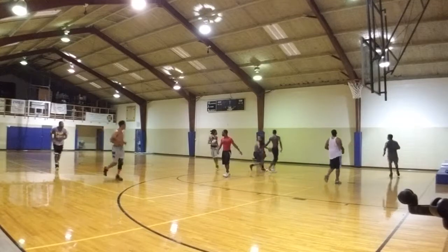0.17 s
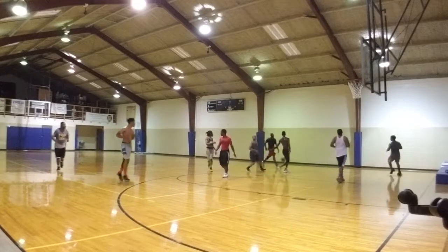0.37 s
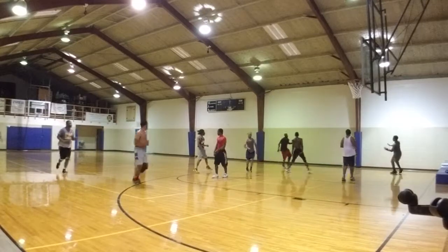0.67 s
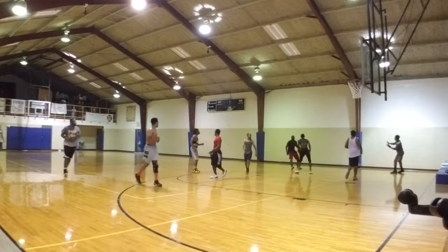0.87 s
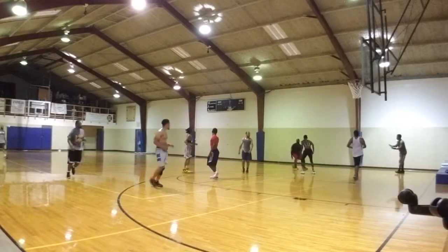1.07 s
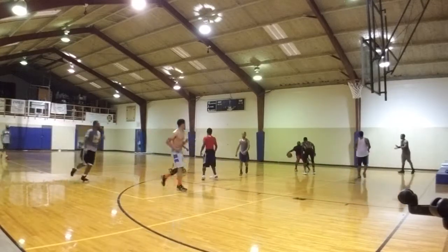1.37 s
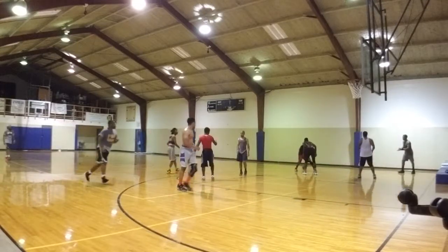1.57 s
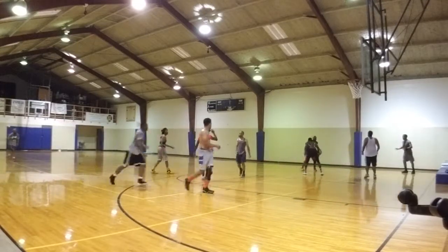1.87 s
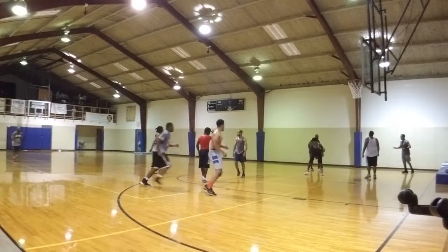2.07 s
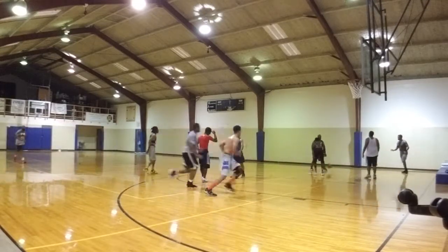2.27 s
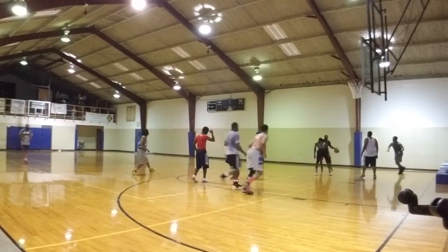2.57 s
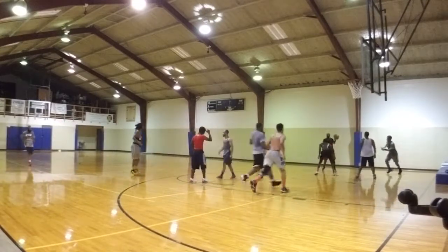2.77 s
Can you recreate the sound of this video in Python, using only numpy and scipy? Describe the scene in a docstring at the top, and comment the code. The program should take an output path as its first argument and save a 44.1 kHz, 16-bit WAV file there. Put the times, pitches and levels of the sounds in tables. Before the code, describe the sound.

A basketball is dribbled four times at an uneven pace on a wooden gym floor, each bounce slapping and booming. Sneakers squeak briefly throughout, with a few footfalls and scuffs, in a large echoing hall with a low ventilation rumble.

```python
"""Pick-up basketball in a large gym.

Rubber soles stick and slip in short squeaks; feet thud and scuff on a sprung wooden floor.
The ball is dribbled four times: a slap, the ping of the air inside, a boom swelling from the boards.
The hall rings on over a low ventilation rumble."""
import sys
import numpy as np
from scipy import signal
from scipy.fft import rfft, irfft
from scipy.io import wavfile

SR = 44100
rng = np.random.default_rng(int(sys.argv[2]) if len(sys.argv) > 2 else 0)


def wrap_up_sound(samples):
    """Save the sound to the file named by the first command line argument, as 16-bit audio."""
    columns = np.atleast_2d(samples).T
    # keep every value between -1 and 1, then stretch to whole-number steps
    tamed = np.clip(columns, -1, 1)
    steps = np.round(tamed * 32767).astype(np.int16)
    wavfile.write(sys.argv[1], SR, steps)


N = 127890
LEAD = SR // 4   # run-in samples: the game is already under way
CUTOFF_HZ = 15700


def from_db(db):
    """Decibels to gain."""
    return 10 ** (np.asarray(db) / 20)


def at_hz(points, hz):
    """Interpolate a table over log frequency."""
    f, value = np.transpose(points)
    return np.interp(np.log(np.maximum(hz, 1)), np.log(f), value)


def noise(spectrum, size):
    """Coloured stereo noise, rms 1, channels alike in the bass."""
    # left-right likeness: freq_hz, correlation
    likeness = [(120, 0.99), (250, 0.91), (550, 0.017)]
    hz = np.fft.rfftfreq(size, 1 / SR)
    alike = np.clip(at_hz(likeness, hz), -.99, .995)
    mid, side = rfft(rng.standard_normal((2, size)))
    stereo = np.sqrt(1 + alike) * mid + np.sqrt(1 - alike) * side * [[1], [-1]]
    x = irfft(from_db(at_hz(spectrum, hz)) * stereo, size)
    return x / x.std()


def wobble(hz, size):
    """Low-passed noise, std 1."""
    x = signal.sosfilt(signal.butter(2, hz, fs=SR, output="sos"), rng.standard_normal(size))
    return x / x.std()


def panned(db):
    """Stereo gains; db is left minus right."""
    return from_db([[db / 2], [-db / 2]])


def add(track, start_s, x):
    """Mix x in at start_s after the run-in."""
    i = LEAD + int(start_s * SR)
    size = min(x.shape[-1], track.shape[-1] - i)
    track[..., i:i + size] += x[..., :size]


def bump(t, peak_s):
    """Envelope: rises to 1 at peak_s, then decays."""
    return t / peak_s * np.exp(1 - t / peak_s)


def floor_mode(t, hz, peak_s, steepness):
    """One resonance of the boards, building up and dying away."""
    return np.sin(2 * np.pi * hz * t) * bump(t, peak_s) ** steepness


def rumble():
    """Steady low noise of ventilation and distant play."""
    # rumble spectrum: freq_hz, density_db
    spectrum = [(35, -16.5), (65, -7.5), (90, -5.5), (125, 0), (170, -4), (280, -12), (400, -20),
                (600, -18.5), (900, -29), (3000, -34.5), (4200, -37.5), (6000, -29.5), (9000, -49),
                (15000, -46)]
    return from_db(-30.5) * noise(spectrum, LEAD + N) * panned(-2.06)


def squeaks():
    """Soles stick and slip thousands of times a second; the rate glides, settles and jitters."""
    # sole slips: start_s, length_s, start_hz, end_hz, level_db, overtone_db, roughness, pan_db, hall_db
    slips = [ (-.08, 0.064, 2440, 2358, -35, -20, 0.57, -6, 2.5),
             (0.063, 0.017, 4940, 4580, -31, -19, 0.42, -9.5, -2.5),
             (0.136, 0.023, 4400, 4080, -40, -19, 0.54, -5, 5),
             (0.299, 0.036, 4950, 4290, -25.5, -6.5, 0.94, -8.5, -1),
             (0.317, 0.018, 3430, 3050, -36, -18, 0.58, 8, 4.5),
             (0.333, 0.048, 4283, 4197, -22.5, -17, 0.73, -2, -4),
             (0.36, 0.0095, 4080, 3710, -31, -4.5, 0.4, -28, 5),
             (0.448, 0.073, 4300, 4160, -31.5, -16, 0.45, -10.5, -4),
             (0.545, 0.046, 5035, 4390, -30, -15.5, 0.93, -7.5, -1),
             (0.562, 0.024, 3464, 3353, -33, -16, 0.28, 3, 0.5),
             (0.669, 0.012, 2530, 2720, -24, -12.5, 0.64, -6.5, -3),
             (0.826, 0.021, 3930, 3604, -28, -10, 0.56, -8.5, 2),
             (0.946, 0.017, 4320, 4100, -15.5, -13, 0.14, 8, -4.5),
             (1.031, 0.0076, 5390, 5516, -19.5, -21, 0.31, -11, 2.5),
             (1.042, 0.017, 5170, 5670, -20, -12, 0.76, -2.5, -2.5),
             (1.071, 0.0089, 4650, 4570, -24, -21, 0.4, -17.5, 6),
             (1.129, 0.0063, 5050, 5500, -22, -30, 0, -18.5, 4),
             (1.192, 0.023, 4105, 3583, -29.5, -5.5, 0.38, -5, 2.5),
             (1.224, 0.026, 4172, 4100, -12.5, -22, 0.18, 3, -8.5),
             (1.249, 0.0181, 3914, 4380, -23.5, -19.5, 0.47, -20.5, 0),
             (1.455, 0.016, 4560, 4370, -36.5, -15, 0.11, -2, 11),
             (1.495, 0.029, 4520, 4600, -26.5, -3.5, 0.31, -6, -1.5),
             (1.524, 0.0046, 5500, 5580, -22, -5, 0.2, -12.5, -6),
             (1.527, 0.018, 6150, 6960, -20, -7.5, 0.07, -10, -6.5),
             (1.815, 0.031, 4140, 3910, -44, -55, 0.02, -18, 6.5),
             (2.0902, 0.01, 5420, 4795, -15, -17.5, 0.16, -5.5, -12),
             (2.145, 0.02, 4753, 4530, -23.5, -16.5, 0, -11, 3.5),
             (2.178, 0.035, 4555, 4490, -21.5, -37, 0.08, -1, -9.5),
             (2.239, 0.062, 4660, 4720, -29, -21, 0.12, -10, -1.5),
             (2.322, 0.0065, 4890, 4597, -20.5, -32, 0.07, -12, 4),
             (2.7584, 0.0038, 3700, 3560, -14.5, -16, 0.2, 3, -6.5),
             (2.811, 0.005, 3690, 3585, -23, -20, 0.4, -8, 0)]
    # overtone gain of the squeaks, dipping near 10 kHz: freq_hz, gain_db
    overtone_colour = [(5500, 12.5), (8000, 0), (10200, -6.5), (12500, 2), (15000, -17)]
    # rubbing noise spectrum: freq_hz, density_db
    rubbing = [(1700, 2.5), (4200, 3), (7000, 13), (10000, -40), (13000, 5), (16000, -55)]
    attack_s, release_s, left_lag_s = .002, .01, .00006
    settle, jitter_depth, jitter_hz, flutter_hz = 2.16, .0537, 197, 183
    out, send = np.zeros((2, LEAD + N)), np.zeros(LEAD + N)
    t = np.arange(SR // 10) / SR
    for start_s, length_s, start_hz, end_hz, level_db, overtone_db, roughness, pan_db, hall_db in slips:
        glide = (1 - np.exp(-settle * t / length_s)) / (1 - np.exp(-settle))
        jitter = 1 + jitter_depth * roughness * wobble(jitter_hz, len(t))
        hz = (start_hz + (end_hz - start_hz) * glide) * jitter
        phase = 2 * np.pi * (np.cumsum(hz) / SR - hz * np.array([[left_lag_s], [0]]))
        overtones = sum(
            from_db(overtone_db + at_hz(overtone_colour, k * end_hz)) * np.sin(k * phase) * 2 / k
            for k in range(2, 5) if k * end_hz < CUTOFF_HZ)
        tone = np.sqrt(2) * (np.sin(phase) + overtones)
        grip = np.clip(t / attack_s, 0, 1) * np.clip((length_s - t) / release_s + .5, 0, 1)
        flutter = 1 + np.tanh(roughness * wobble(flutter_hz, len(t)))
        rasp = roughness * from_db(-10) * noise(rubbing, len(t))
        squeak = from_db(level_db) * grip * flutter * (tone + rasp)
        add(out, start_s, squeak * panned(pan_db))
        add(send, start_s, from_db(hall_db) * squeak[1])
    return out, send


def feet():
    """Feet thud on the boards and scuff the varnish."""
    # footfalls: start_s, level_db, pitch_hz
    steps = [(0.156, -25.5, 108.2), (0.726, -20.5, 132.6), (2.782, -28, 116.2)]
    # shoe scuffs: start_s, level_db
    scuffs = [(0.709, -18.5), (2.451, -30), (2.641, -35), (2.768, -29.5)]
    # scuff spectrum: freq_hz, density_db
    scuff_spectrum = [(1200, 3), (2600, 12), (6000, 7), (11000, -17)]
    out = np.zeros((2, LEAD + N))
    t = np.arange(SR // 4) / SR
    for start_s, level_db, pitch_hz in steps:
        add(out, start_s, from_db(level_db) * floor_mode(t, pitch_hz, peak_s=.012, steepness=.65))
    for start_s, level_db in scuffs:
        add(out, start_s, from_db(level_db) * bump(t, peak_s=.0018) * noise(scuff_spectrum, len(t)))
    return out, from_db(-5) * out[0]


def ball():
    """Each bounce slaps, rings the air in the ball and sets the boards booming."""
    # dribbles: start_s, slap_db, low_ping_db, high_ping_db, boom_db
    bounces = [(.348, -3.5, -49, -35.5, -4.5), (1.118, -9.5, -32.5, -51.5, -11.5),
               (1.599, -14, -34.5, -50, -10), (2.339, -7, -27.5, -66, -4.5)]
    # air modes of the ball: pitch_hz, t60_s
    air_modes = [(1000, 0.063), (1637, 0.35)]
    # floor modes: pitch_hz, level_db, peak_s, steepness
    boards = [(52.4, -16.5, 0.011, 1), (68.4, -10, 0.056, 4.1), (117.64, -8.5, 0.028, 1.08),
              (173.2, -20.5, 0.028, 1.6), (283.3, -33.5, 0.05, 1.2)]
    # slap spectrum: freq_hz, density_db
    slap = [(35, -4), (200, 10.5), (550, -1.5), (1000, 2.5), (1700, -0.5), (2500, -7.5), (6000, -16),
            (12000, -23.5)]
    # floor and wall echoes: delay_s, gain_db
    echoes = [(0.0132, -2), (0.023, 0), (.099, -10.5)]
    tick_s, tick_width_s, hall_db = .0035, .0022, 5
    echo_lowpass = signal.butter(1, 4000, fs=SR, output="sos")
    out, send = np.zeros((2, LEAD + N)), np.zeros(LEAD + N)
    t = np.arange(SR // 2) / SR
    boom = sum(from_db(db) * floor_mode(t, hz, peak_s, steepness) for hz, db, peak_s, steepness in boards)
    tick_shape = np.exp(-((t - tick_s) / tick_width_s) ** 2)
    for start_s, slap_db, *pings_db, boom_db in bounces:
        ping = sum(from_db(db - 60 * t / t60_s) * np.sin(2 * np.pi * hz * t)
                   for db, (hz, t60_s) in zip(pings_db, air_modes))
        slap_envelope = from_db(slap_db - 14) * bump(t, peak_s=.0021)
        hit = ping + slap_envelope * noise(slap, len(t))
        # bright click as the ball flattens; faint on soft bounces
        tick = from_db(2 * slap_db - 13) * tick_shape * rng.standard_normal((2, len(t)))
        add(out, start_s, (tick + hit + from_db(boom_db) * boom) * panned(-1.4))
        for delay_s, gain_db in echoes:
            echo = signal.sosfilt(echo_lowpass, slap_envelope * noise(slap, len(t)))
            add(out, start_s + delay_s, from_db(gain_db) * echo)
        add(send, start_s, from_db(hall_db) * hit[0])
    return out, send


def hall(x):
    """Scattered first reflections, then a diffuse tail that dies soonest in the high treble."""
    # reverberation time: freq_hz, t60_s
    decay = [(250, 2.2), (1000, 1.23), (4500, 2.18), (7000, 0.81), (13000, 0.69)]
    build_s, early_decay_s, reflections_per_s, early_db = .029, .031, 600, .5
    size = 2 * SR
    t, hz = np.arange(size) / SR, np.fft.rfftfreq(size, 1 / SR)
    white = rfft(noise([(1, 0), (SR, 0)], size))
    centres_hz = np.geomspace(60, 15000, 12)
    tail = np.zeros((2, size))
    for centre_hz, weights in zip(centres_hz, np.eye(len(centres_hz))):
        band = irfft(white * at_hz(np.c_[centres_hz, weights], hz), size)
        tail += band * from_db(-60 * t / at_hz(decay, centre_hz))
    tail *= (1 - np.exp(-t / build_s)) / np.sqrt(SR / 10)
    early = rng.standard_normal((2, size)) * (rng.random((2, size)) < reflections_per_s / SR)
    early *= np.exp(-t / early_decay_s) * (t > .003)
    early /= np.sqrt((early ** 2).sum() / 2)
    early = signal.sosfilt(signal.butter(1, 400, "high", fs=SR, output="sos"), early)
    return signal.fftconvolve(x[None], tail + from_db(early_db) * early, axes=1)[:, :len(x)]


def scene():
    """Ball and shoes, direct and through the hall, over the rumble."""
    direct, sends = zip(*(ball(), squeaks(), feet()))
    room = hall(sum(sends)) * panned(-3.5) + rumble()
    return (sum(direct) + room)[:, LEAD:]


def record(dry):
    """Steep low-pass at CUTOFF_HZ."""
    return signal.sosfilt(signal.ellip(10, .2, 80, CUTOFF_HZ, fs=SR, output="sos"), dry)


dry = scene()
out = record(dry)
wrap_up_sound(out)
```